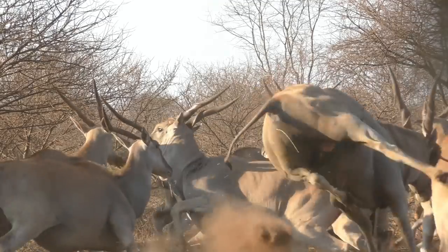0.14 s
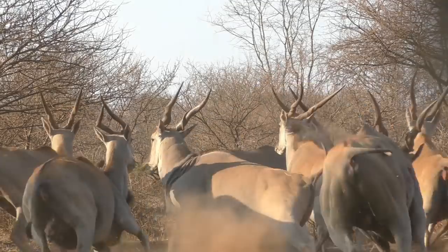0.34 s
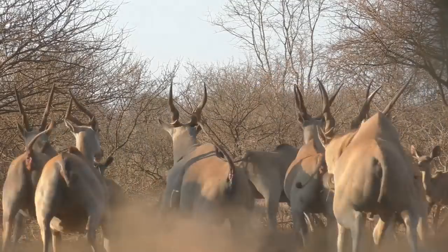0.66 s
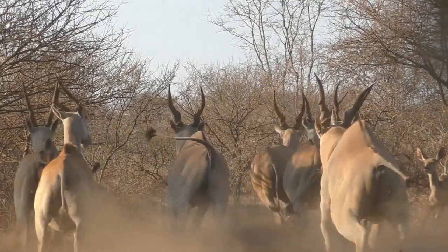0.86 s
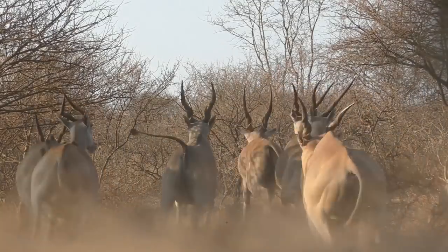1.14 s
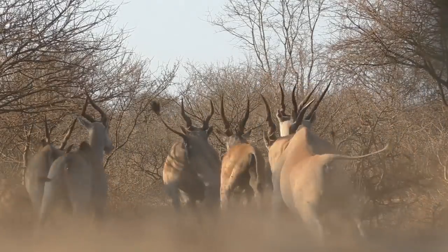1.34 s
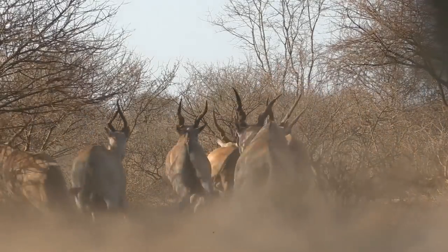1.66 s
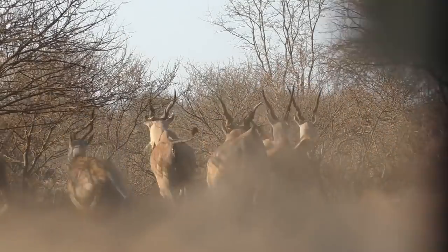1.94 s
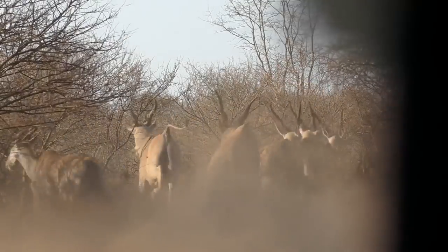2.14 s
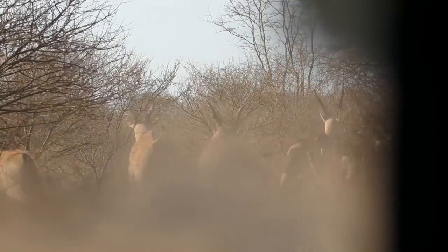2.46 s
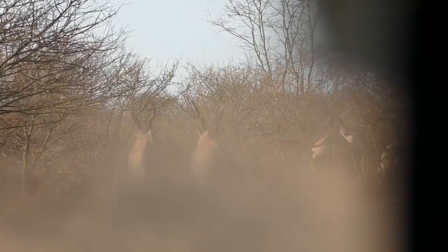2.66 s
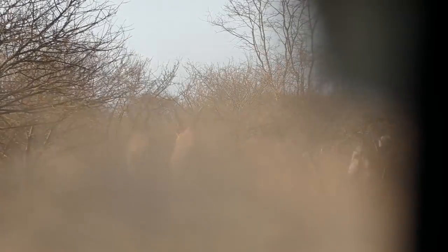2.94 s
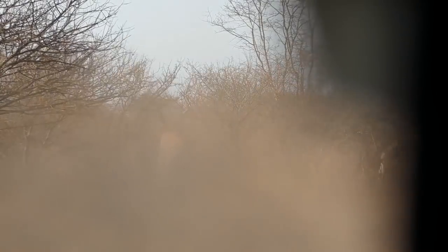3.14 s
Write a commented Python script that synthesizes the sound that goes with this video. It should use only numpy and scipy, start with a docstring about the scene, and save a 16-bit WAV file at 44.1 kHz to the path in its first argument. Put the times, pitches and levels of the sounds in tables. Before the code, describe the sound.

A herd of antelope bolts through dry bush, dull hooves thudding over a low rumble. Sticks snap, brush crackles and one branch cracks sharply close by. Faint falling whistles, probably birds, come through as the herd recedes.

```python
"""Dry thorn bush on sandy ground: a herd of antelope bolts away.
Near hooves thud and the rest merge into a rumble. Sticks snap, one branch cracks close by,
trampled brush crackles and rustles, and thorny twigs swish along the flanks.
The thicket scatters every snap into a short tail. Faint falling whistles, probably birds,
come through as the herd recedes."""
import sys
import numpy as np
from scipy import signal
from scipy.fft import rfft, irfft, next_fast_len
from scipy.io import wavfile

SR = 44100
rng = np.random.default_rng(int(sys.argv[2]) if len(sys.argv) > 2 else 0)


def output_pcm(signal):
    """Save a mono or channel-first signal as 16-bit PCM at the path in sys.argv[1].

    Samples are clipped to [-1, 1] before scaling.
    """
    pcm = np.clip(np.atleast_2d(signal).T, -1, 1) * 32767
    wavfile.write(sys.argv[1], SR, np.round(pcm).astype(np.int16))


N = 145530
T = np.arange(N) / SR

# The nearest hoof falls. Each row: start in seconds, relative level in dB, thud pitch in Hz.
HOOF_FALLS = [(0.193, -33.5, 337), (0.324, -28.5, 98), (0.463, -26, 85), (0.466, -27, 290),
              (0.497, -32.5, 260), (0.576, -31.5, 201), (0.964, -35, 192), (1.06, -35, 75),
              (1.246, -30, 224), (1.262, -26.5, 108), (1.405, -32, 215), (1.452, -32.5, 82),
              (1.527, -34.5, 374), (1.539, -29, 205), (1.632, -32.5, 95), (1.675, -35, 190),
              (1.877, -28.5, 185), (1.922, -35.5, 310), (1.968, -31, 220), (2.04, -29.5, 260),
              (2.11, -31.5, 85), (2.585, -35.5, 190), (2.736, -35.5, 220), (2.985, -39, 230),
              (3.142, -36, 220)]
# Breaking sticks. Each row: start in seconds, relative level in dB, pitch in Hz.
STICK_SNAPS = [(0.176, -31.5, 1280), (0.195, -28.5, 1380), (0.4953, -22.5, 6700), (0.573, -27, 2830),
               (.599, -30, 2680), (0.687, -25, 5300), (1.0195, -23, 2180), (1.034, -24, 2520),
               (1.075, -24, 1470), (1.078, -23.5, 3260), (1.1907, -18.5, 3550), (1.263, -31, 1560),
               (1.437, -21, 1950), (1.441, -21.5, 1060), (1.5273, -28, 1090), (1.5487, -22.5, 2880),
               (1.5883, -30, 2070), (1.6225, -18, 3170), (1.6248, -30, 1490), (1.702, -20.5, 1500),
               (1.7752, -22.5, 2200), (1.9455, -20.5, 2400), (1.948, -26.5, 1400), (2.04, -29.5, 1310),
               (2.232, -25.5, 1410), (2.7277, -27, 2500), (2.8307, -24.5, 3570), (3.011, -30.5, 2390),
               (3.036, -31, 1290)]
# Where the sticks break. Each row: time in seconds, left over right in dB.
SNAP_PAN = [(.7, -4), (1.05, 2.5), (3.0, -.5)]
# The ring of the close branch. Each row: frequency in Hz, relative level in dB.
BRANCH_MODES = [(2474, -2), (2850, -10), (3200, -3), (4060, -1), (4335, 5.5), (4650, 2), (5680, -5),
                (6345, 0)]
# Bodies brushing past bushes. Each row: peak time in seconds, length in seconds, level in dB.
FLANK_SWISHES = [(0.097, 0.031, -48), (0.369, 0.045, -43.5), (0.507, 0.06, -45.5), (0.725, 0.047, -49.5),
                 (1.095, 0.084, -47.5), (1.212, 0.053, -44), (1.5, 0.16, -42.5), (1.856, 0.21, -49),
                 (1.975, 0.028, -44), (2.139, 0.03, -41.5), (2.552, 0.036, -45), (3.023, 0.027, -50.5)]
# Bird notes. Each row: start and length in seconds, first and last pitch in Hz, level in dB.
BIRD_NOTES = [(1.907, .034, 3100, 2270, -41), (2.304, 0.026, 3050, 2160, -43.5),
              (2.461, 0.026, 2950, 2060, -43), (2.518, .07, 3093, 1696, -44.5),
              (2.649, 0.04, 4400, 3100, -50), (2.673, 0.061, 2800, 2630, -46),
              (2.898, 0.042, 2750, 1440, -43.5), (3.216, 0.026, 2950, 2323, -46.5)]

# Fader rides for the beds. Each row: time in seconds, relative level in dB.
RUMBLE_RIDE = [(0.0, -43.5), (1.86, -43), (2.3, -44.5), (3.3, -48)]
BRUSH_RIDE = [(0, -49.2), (.9, -48.2), (1.35, -45), (1.5, -46), (1.97, -42.5), (2.2, -46), (2.9, -47),
              (3.3, -47.5)]
GRASS_RIDE = [(0, -53), (1.3, -53.5), (1.55, -54), (1.9, -50.5), (2.25, -55.5), (3.3, -57.5)]

# Tone curves. Each row: frequency in Hz, gain in dB.
GROUND_EQ = [(20, -40), (40, -6.5), (60, -4.5), (85, 1), (108, -2.5), (130, -15), (165, -2.5), (215, 0),
             (300, -8.5), (420, -13.5), (600, -28.5), (1200, -26), (4000, -90)]  # dull, sandy soil
STICK_EQ = [(200, -34), (750, -9.5), (1100, 2), (3800, -1), (5200, -4), (9000, -4.5), (15000, -21)]  # dry sticks
BRANCH_EQ = [(300, -17), (800, -39), (1300, -3), (3000, 2), (5100, -0.5), (6400, 6), (7500, -6),
             (10000, -5.5), (15000, -17)]  # the close crack
SHARD_EQ = [(700, -27), (1400, 1), (9000, 5), (14000, -12), (16000, -16)]  # its bright splinters
BRUSH_EQ = [(200, -26.5), (500, -7.5), (760, -10.5), (1050, -0.5), (1450, 0), (1800, -1.5), (2500, 0),
            (3500, -4), (5000, -10), (6400, -14.5), (9000, -14.5), (15000, -57)]  # trampled twigs and litter
GRASS_EQ = [(2000, -7.5), (5000, -0.5), (6500, 6.5), (7800, -0.5), (9600, 6), (12000, 3.5), (14000, 3),
            (16000, -4.5)]  # airy dry grass
SWISH_EQ = [(500, -15), (1200, 1.5), (2800, 5), (5000, 2), (6500, -3), (8000, -0.5), (10000, -3.5),
            (15000, -21)]  # thorns on hide
SIDE_EQ = [(50, -13), (200, -11.5), (600, -9.5), (1200, -10.5), (2400, -8.5), (4500, -7), (8000, -22),
           (14000, -55)]  # stereo side signal against the mid

HOOF_DB, SCUFF_DB, SCUFF_T60_S, HOOF_Q = 20.5, -2, 0.042, 1.7
STEPS_PER_S, RUMBLE_DB = 600, -1.5
SNAP_DB, SNAP_Q, SNAP_T60_S, SPLINTER_DB = 11, 3.4, 0.0055, -10.5
SNAP_EDGE_RATIO = 2.15  # low-pass corner over pitch: thick sticks sound duller
BRANCH_S, BRANCH_DB, CRACK_T60_S, RIGHT_LAG_S = 0.7662, 2.5, 0.012, 0.000012
TEAR_LEAD_S, TEAR_DB, TEAR_T60_S = 0.0042, -10, 0.076
RING_DB, RING_T60_S = -39.5, 0.17
SHARDS_PER_S, SHARDS_DB, SHARDS_T60_S = 3700, -8, 0.25
TWIGS_PER_S, CRACKLE_DB, CRACKLE_Q = 480, -2.5, 4.8
RUSTLE_DB, RUSTLE_FLUTTER_DB = -0.5, 1.02
GRASS_TICKS_PER_S, GRASS_DB, GRASS_FLUTTER_DB = 9000, 1, 1.77
WHISTLE_WAVER, WHISTLE_BEND = 0.025, 1.2
THICKET_T60_S, THICKET_CUTOFF_HZ, THICKET_WIDTH_DB = 0.21, 8200, 1.5
CUTOFF_HZ = 15900


def hooves():
    """Each near hoof gives one soft push and a scuff; the ground answers at the pitch of that spot."""
    out = np.zeros(N)
    for start, db, hz in HOOF_FALLS:
        contact = from_db(SCUFF_DB) * burst(SCUFF_T60_S)
        contact[0] -= 1  # the push
        thud = resonate(colour(contact, GROUND_EQ), hz, HOOF_Q)
        add(out, start, from_db(db + HOOF_DB) * energy_one(thud))
    return out * pan(-2.5)


def herd_rumble():
    """The steps of the whole herd run together into a low bed."""
    mid, side = (impacts(STEPS_PER_S, spread_db=2, max_spreads=2.8) for _ in range(2))
    rumble = rms_one(colour(widen(mid, side), GROUND_EQ))
    return from_db(RUMBLE_DB) * level(RUMBLE_RIDE) * rumble * pan(-0.77)


def stick_snaps():
    """A stick fails within milliseconds and rings briefly at its own pitch."""
    out = np.zeros((2, N))
    for start, db, hz in STICK_SNAPS:
        pan_db = np.interp(start, *np.transpose(SNAP_PAN))
        fracture = lowpass(burst(SNAP_T60_S), SNAP_EDGE_RATIO * hz, order=2)
        snap = colour(resonate(fracture, hz, SNAP_Q) + from_db(SPLINTER_DB) * fracture, STICK_EQ)
        add(out, start, from_db(db + SNAP_DB) * energy_one(snap) * pan(pan_db))
    return out + thicket(out, send_db=-1.5)


def branch_crack():
    """Fibres tear, the branch breaks, splinters follow and the dry wood rings."""
    crack, ring, shards = np.zeros((3, N))
    tear = energy_one(colour(burst(TEAR_T60_S), BRANCH_EQ))
    add(crack, BRANCH_S - TEAR_LEAD_S, from_db(TEAR_DB) * tear)
    add(crack, BRANCH_S, energy_one(colour(burst(CRACK_T60_S), BRANCH_EQ)))
    t = T[:SR // 2]
    for hz, db in BRANCH_MODES:
        add(ring, BRANCH_S, from_db(db + RING_DB - 60 * t / RING_T60_S) * np.sin(2 * np.pi * hz * t))
    spray = impacts(SHARDS_PER_S, spread_db=2.9) * from_db(-60 * T / SHARDS_T60_S)
    add(shards, BRANCH_S, from_db(SHARDS_DB) * energy_one(colour(spray, SHARD_EQ)))
    left, right = from_db(BRANCH_DB) * (crack + ring + shards + thicket(crack, send_db=1.5)) * pan(-2.5)
    delay = np.exp(-2j * np.pi * np.arange(N // 2 + 1) * SR / N * RIGHT_LAG_S)  # under one sample
    return np.array([left, irfft(rfft(right) * delay, N)])


def trampled_brush():
    """Countless small twigs crackle over rustling litter and the hiss of dry grass."""
    twigs, pitches_hz = np.zeros((2, N)), np.geomspace(1000, 9000, num=18)
    for hz in pitches_hz:
        breaks = impacts(TWIGS_PER_S / len(pitches_hz), spread_db=4.5, max_spreads=2.8)
        twigs += resonate(breaks, hz, CRACKLE_Q) * pan(rng.normal(0, 1))
    crackle = from_db(CRACKLE_DB) * rms_one(colour(twigs + thicket(twigs, send_db=-0.5), BRUSH_EQ))
    stir = drift(hz=14)  # litter and grass flutter together
    rustle = rms_one(colour(widen(*rng.standard_normal((2, N))), BRUSH_EQ))
    rustle *= from_db(RUSTLE_DB + RUSTLE_FLUTTER_DB * stir)
    ticks = widen(impacts(GRASS_TICKS_PER_S, spread_db=3.8), rng.standard_normal(N) / 2)
    grass = rms_one(colour(ticks, GRASS_EQ)) * from_db(GRASS_DB + GRASS_FLUTTER_DB * stir)
    return level(BRUSH_RIDE) * (crackle + rustle) + level(GRASS_RIDE) * grass


def flank_swishes():
    """Thorny twigs scrape along a flank in a short swell of fine clicks."""
    swell = sum(from_db(db) * np.exp(-2 * ((T - peak) / length) ** 2)
                for peak, length, db in FLANK_SWISHES)
    scrape = widen(impacts(per_s=7000, spread_db=3.5), impacts(per_s=7000, spread_db=3.1))
    return swell * rms_one(colour(scrape, SWISH_EQ))


def bird_whistles():
    """Distant notes that fall quickly and level off; a fast pitch waver makes them raspy."""
    out = np.zeros(N)
    waver = 1 + WHISTLE_WAVER * drift(hz=297)
    for start, length, first_hz, last_hz, db in BIRD_NOTES:
        progress = np.clip((T - start) / length, 0, 1)
        hz = (last_hz + (first_hz - last_hz) * (1 - progress) ** WHISTLE_BEND) * waver
        arch = 2 * np.sqrt(progress * (1 - progress))
        out += from_db(db) * arch * np.sin(2 * np.pi * np.cumsum(hz) / SR)
    return out + thicket(out, send_db=-4)


def thicket(x, send_db):
    """Dense short reflections off stems and branches, wet signal only."""
    scatter = widen(burst(THICKET_T60_S), from_db(THICKET_WIDTH_DB) * burst(THICKET_T60_S))
    echoes = lowpass(scatter, THICKET_CUTOFF_HZ, order=1)
    return from_db(send_db) * signal.fftconvolve(np.atleast_2d(x), echoes, axes=-1)[:, :N]


def impacts(per_s, spread_db, max_spreads=3.7):
    """Random clicks, many small and a few large, spanning max_spreads times spread_db."""
    sizes = from_db(spread_db * np.minimum(rng.exponential(1, N), max_spreads)) * rng.choice([-1, 1], N)
    return sizes * (rng.random(N) < per_s / SR)


def burst(t60):
    """A dying run of tiny contacts: decaying noise of energy 1."""
    t = T[:SR // 2]
    return energy_one(rng.standard_normal(len(t)) * from_db(-60 * t / t60))


def drift(hz):
    """Random modulation of rms 1, rolled off above hz."""
    pole = np.exp(-2 * np.pi * hz / SR)
    return rms_one(signal.lfilter([1], [1, -2 * pole, pole * pole], rng.standard_normal(N + SR))[SR:])


def colour(x, curve):
    """Minimum-phase EQ through (Hz, dB) points, so attacks get no pre-ring."""
    size = 2 * next_fast_len(x.shape[-1] // 2 + SR // 10)
    hz, db = np.transpose(curve)
    bin_hz = np.arange(size // 2 + 1) * SR / size
    cepstrum = irfft(np.log(from_db(np.interp(np.log(bin_hz + 1), np.log(hz), db))))
    cepstrum[1:size // 2] *= 2
    cepstrum[size // 2 + 1:] = 0
    return irfft(rfft(x, size) * np.exp(rfft(cepstrum)))[..., :x.shape[-1]]


def resonate(x, hz, q):
    """One resonance with unity gain at its peak."""
    return signal.lfilter(*signal.iirpeak(min(hz, .4 * SR), max(q, 1), fs=SR), x + 1e-18)


def lowpass(x, hz, order):
    """Roll off the highs."""
    return signal.sosfilt(signal.butter(order, min(hz, SR / 3), fs=SR, output="sos"), x)


def widen(mid, side):
    """Mid and side to stereo, widest in the presence range."""
    return mid + colour(side, SIDE_EQ) * np.array([[1], [-1]])


def pan(db):
    """Channel gains, left over right by db."""
    return from_db(np.array([[db], [-db]]) / 2)


def level(ride):
    """Gain through time along a fader ride."""
    return from_db(np.interp(T, *np.transpose(ride)))


def add(out, start, sound):
    """Mix a sound in at a start time in seconds."""
    i = max(int(start * SR), 0)
    out[..., i:i + sound.shape[-1]] += sound[..., :max(N - i, 0)]


def from_db(db):
    """Decibels to gain."""
    return 10 ** (np.asarray(db) / 20)


def rms_one(x):
    """Scale to rms 1."""
    return x / np.sqrt(np.mean(x ** 2) + 1e-20)


def energy_one(x):
    """Scale to energy 1."""
    return x / np.sqrt(np.sum(x ** 2) + 1e-20)


def scene():
    """The mix: herd, bush and birds."""
    herd = hooves() + herd_rumble()
    bush = stick_snaps() + branch_crack() + trampled_brush() + flank_swishes()
    return herd + bush + bird_whistles()


def record(dry):
    """A steep high cut on the whole mix."""
    return signal.sosfilt(signal.ellip(12, .1, 80, CUTOFF_HZ, fs=SR, output="sos"), dry)


dry = scene()
out = record(dry)
output_pcm(out)
```